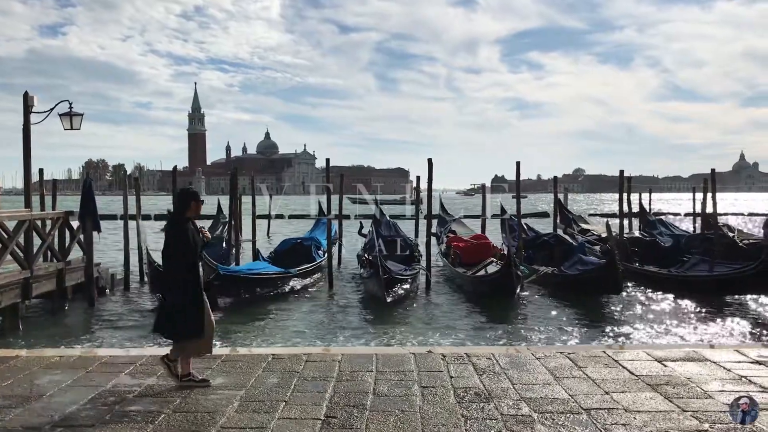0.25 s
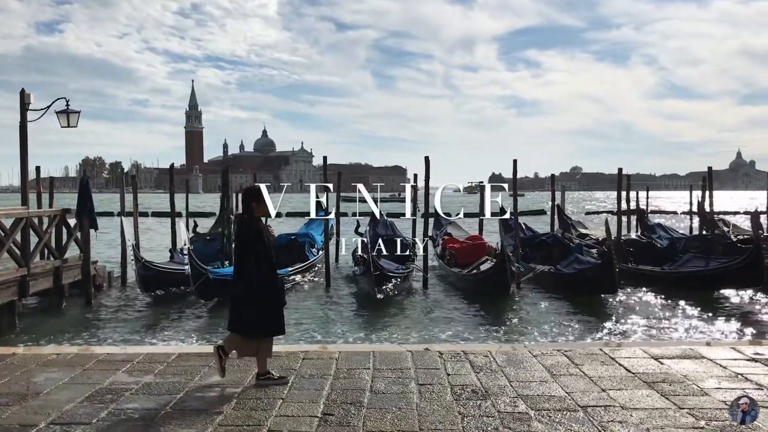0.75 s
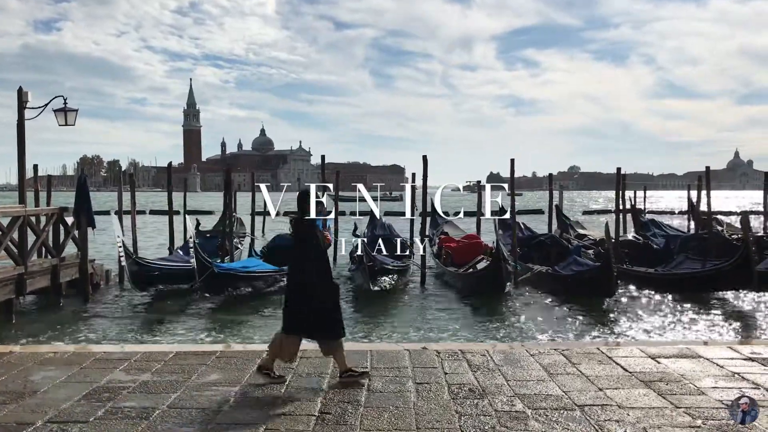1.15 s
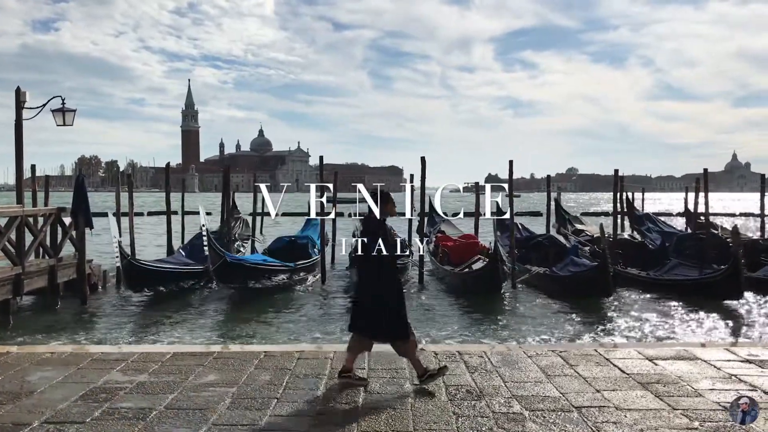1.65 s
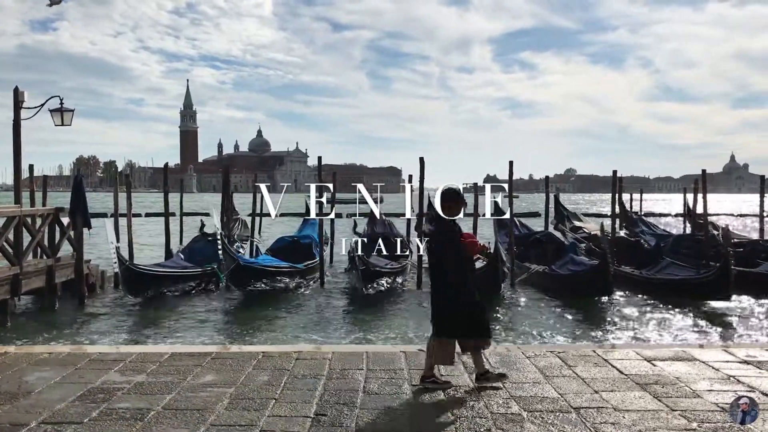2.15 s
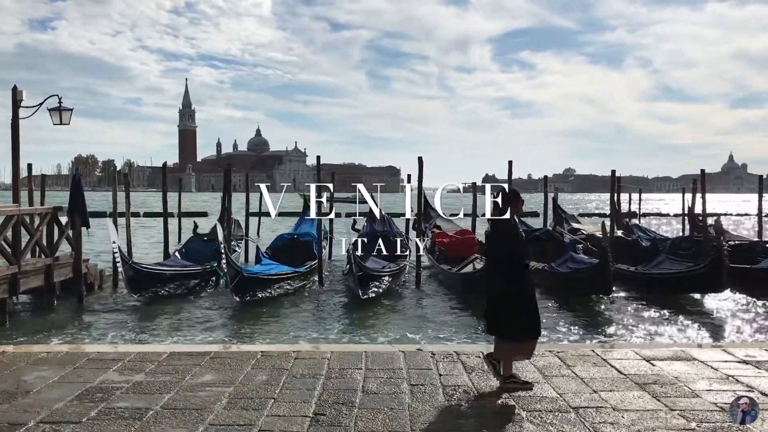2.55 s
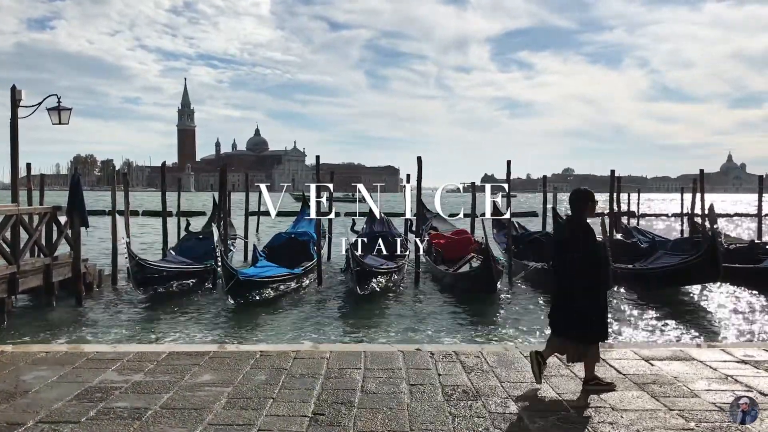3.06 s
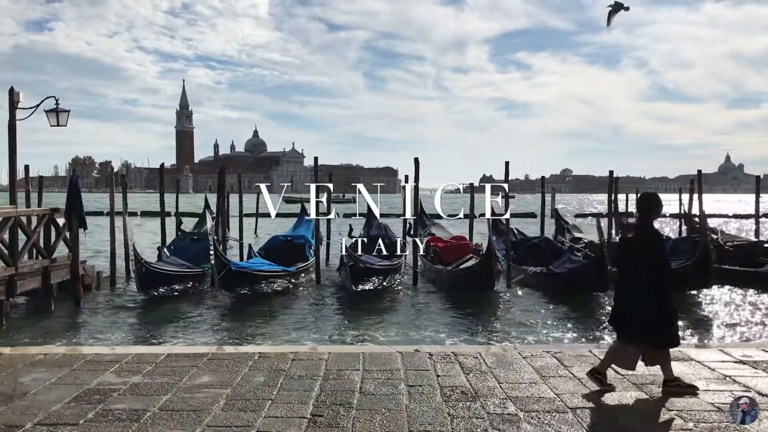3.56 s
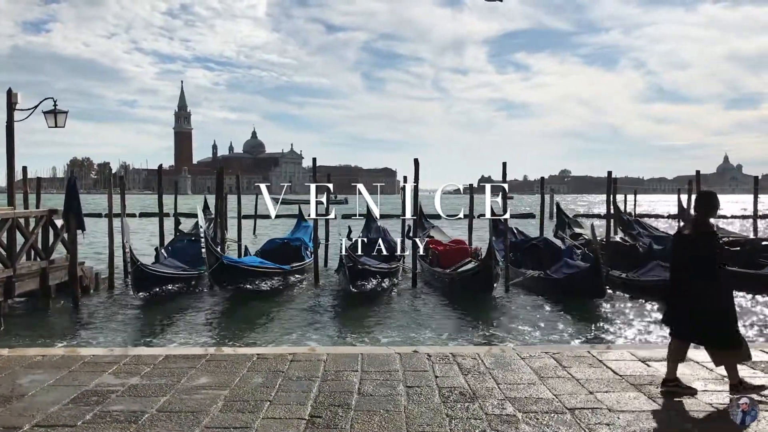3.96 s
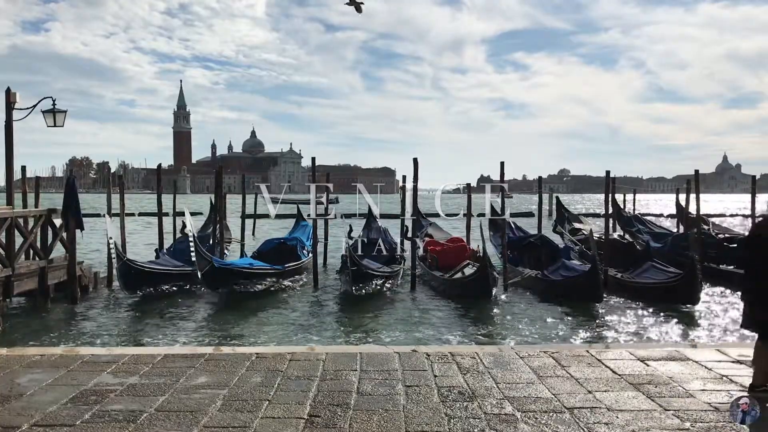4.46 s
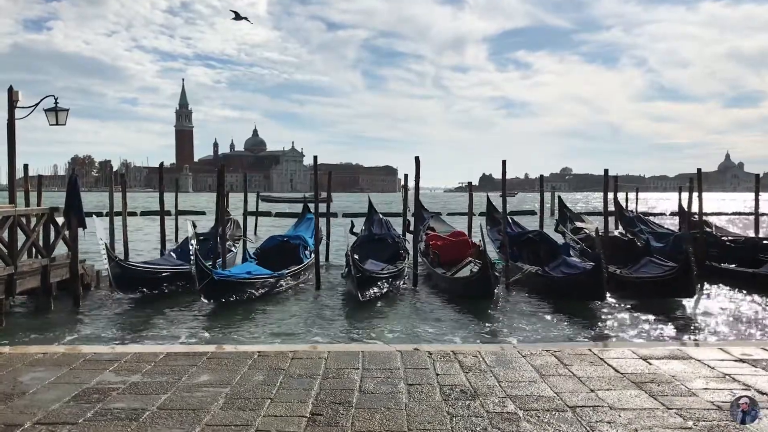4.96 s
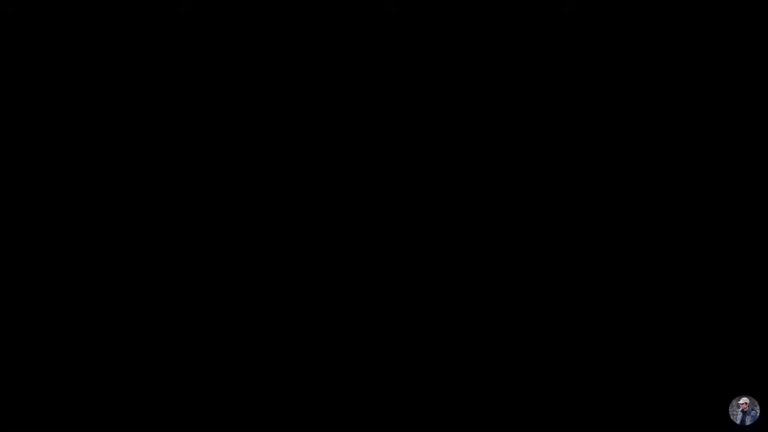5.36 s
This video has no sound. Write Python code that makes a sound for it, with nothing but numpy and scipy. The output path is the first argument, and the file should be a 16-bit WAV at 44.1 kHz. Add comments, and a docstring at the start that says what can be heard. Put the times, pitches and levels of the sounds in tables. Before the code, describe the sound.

Water washes against a stone quay close to the microphone in three surges, the first softer and the next two fuller. Each swells with gurgling bubbles and light spray, then drains away with distinct plops and sharp drips. Between them, water laps gently around moored wooden boats across a wide outdoor space. A faint low harbour rumble and thin hiss lie underneath.

```python
"""Three surges of water break on a stone quay close by, each a swarm of ringing bubbles with spray.
Single large bubbles and sharp drops stand out, thrown back by hulls, piles and stone.
Fine droplets tick on wet stone, and lagoon water laps far and wide around moored boats.
A thin hiss and a low harbour rumble lie underneath. The sound cuts off shortly before the end."""
import sys
import numpy as np
from scipy import signal
from scipy.fft import rfft, irfft
from scipy.io import wavfile
from scipy.ndimage import uniform_filter1d

SR = 44100
rng = np.random.default_rng(int(sys.argv[2]) if len(sys.argv) > 2 else 0)


def wav_record(signal):
    """Record a signal, one row per channel, as 16-bit PCM in the file named by sys.argv[1]."""
    frames = np.transpose(np.atleast_2d(signal))
    bounded = np.clip(frames, -1, 1)
    # unit amplitude maps onto the largest positive 16-bit level
    quanta = np.round(bounded * 32767).astype(np.int16)
    wavfile.write(sys.argv[1], SR, quanta)


N = 247682
HZ = np.fft.rfftfreq(N, 1 / SR)

# Overlapping waves that make up the three surges; spray and slosh are relative to the body:
# crest_s, body_db, build_s, drain_s, spray_db, left_over_right_db, slosh_db
WAVES = [(.23, -33.5, 0.084, 0.17, -13.5, 5, -27), (.37, -33, 0.15, 0.24, 0, 6, -20),
         (0.489, -28.5, 0.36, 0.28, -19, 4, -15), (.8, -36.5, 0.45, 0.2, -13.5, -8.5, -14),
         (2.082, -24.5, 0.15, 0.51, -9, 1.5, -14), (2.27, -20.5, 0.33, 0.19, -14.5, 0, -18.5),
         (2.37, -25, .15, 0.21, -17.5, -1, -26), (3.881, -29.5, 0.13, 0.27, -9.5, -0.5, -19.5),
         (4.062, -21.5, 0.26, 0.33, -15, 3, -25.5), (4.27, -35, 0.51, 0.23, -12.5, 2.5, -18.5)]
# Tone colour of the near breaking water: frequency_hz, gain_db
SURGE_TONE = [(71, -76), (120, -43), (266, -10.5), (369, -5), (522, -6), (906, -1), (2510, -9),
              (4830, -19.5), (6700, -20.5), (9880, -28), (14600, -29.5), (15800, -31.5)]
# How alike both sides of the near water sound (1 is mono): frequency_hz, likeness
SURGE_LIKENESS = [(110, .7), (200, 0.83), (380, 0.92), (1290, 0.91), (2380, .88), (4400, 0.99), (7000, 1),
                  (9800, 0.78), (12000, .45), (15000, .3)]
# Single large bubbles: start_s, level_db, pitch_hz, left_over_right_db, rise_octaves, ring_cycles
LARGE_BUBBLES = [(0.1818, -22.5, 2280, 4, 0.11, 3.4), (.206, -27, 560, 2, 0.16, 11),
                 (0.31, -30, 228, 3.5, .03, 7.8), (0.335, -28, 940, -5, 0.37, 13),
                 (0.4683, -19.5, 1196, 2, .06, 11), (.517, -24, 358, 5, 1.42, 9.1),
                 (0.549, -34.5, 286, 5, 0.32, 13), (0.564, -36, 940, 18, 0.33, 8.3),
                 (0.634, -34, 965, 15, 0.18, 26), (.7, -28, 640, -2.5, .19, 6.9),
                 (.727, -26, 545, -3, 0.27, 4.1), (.793, -30.5, 634, -8, 0.48, 23),
                 (.833, -33.5, 347, -3, 1.2, 24.4), (.87, -29, 696, -8, .61, 11),
                 (1.456, -37.5, 719, 11, .26, 6.8), (1.5244, -35.5, 1390, 13, .09, 11),
                 (1.548, -34.5, 1430, 16, .1, 6.9), (1.7694, -29.5, 1830, 12, .1, 8.4),
                 (1.81, -35, 1800, 10, .1, 11), (1.9615, -20, 2640, 4, .12, 4.4),
                 (2.024, -26, 333, 4, 0.18, 5.8), (2.056, -19, 433, 0, 0.12, 7.3),
                 (2.066, -29.5, 236, 1, .1, 8.2), (2.226, -25, 328, -1, 0.73, 18),
                 (2.293, -17.5, 342, -1, 1.77, 11), (2.32, -25, 343, 0, 1.5, 23.5),
                 (2.345, -30, 740, -11, 0.19, 13), (2.369, -32.5, 300, 4.5, 1.3, 11),
                 (2.394, -17.5, 616, 0, 0.16, 6.5), (2.543, -29.5, 1510, -1, .1, 24),
                 (2.571, -27, 863, 5, 0.7, 19.2), (2.684, -33.5, 630, -17, 0.21, 6.6),
                 (2.699, -35.5, 656, -8, 0.33, 14), (2.744, -39.5, 686, -13, 0.12, 11),
                 (2.764, -36.5, 413, -7, .14, 7.8), (3.0545, -32, 1480, 19, .09, 12),
                 (3.0704, -34, 1660, 13, .1, 12), (3.6681, -23.5, 2710, 1, .1, 7.3),
                 (3.702, -35, 252, 9, 0.18, 3.3), (3.759, -24.5, 2720, -.5, .1, 8.6),
                 (3.81, -22.5, 815, 2.5, 0.12, 13.5), (3.864, -27, 690, -5, .18, 17),
                 (3.869, -35, 253, -2, 0.092, 8), (3.909, -28, 407, 3, .1, 7.4),
                 (3.94, -28, 410, 5, .09, 11), (3.955, -33, 246, 3, 0.43, 12),
                 (4.015, -16, 650, 2, 0.19, 4.2), (4.1028, -13.5, 1396, 3, .1, 9),
                 (4.119, -20.5, 311, 3, 1.45, 9.2), (4.129, -22, 610, 4, 0.54, 12.6),
                 (4.1515, -16, 1610, 2, .14, 13), (4.209, -30, 293, 4.5, 0.12, 5),
                 (4.235, -21.5, 1130, 5, 0.35, 10.7), (4.255, -28, 303, 2.5, 0.79, 5.2),
                 (4.301, -23, 324, 5.5, 1.33, 4.4), (4.309, -26.5, 588, 13, 1.41, 8.9)]
# Drops striking stone and water: start_s, level_db, pitch_hz, left_over_right_db, ring_cycles
SHARP_DROPS = [(.0308, -37.5, 4940, -1, 7.9), (0.044, -41.5, 3570, .5, 8.6), (.1067, -41, 2820, -1.5, 7.4),
               (.1201, -39, 12890, 5, 7), (.1371, -36, 3370, 4.5, 7.2), (.182, -31, 5290, 6, 2.2),
               (.2044, -32, 5200, 3, 8.9), (.247, -21, 6100, 2, 2), (.3524, -28, 5070, 10, 1.8),
               (0.454, -32, 6950, .5, 6.4), (.543, -34.5, 8700, -7, 38), (.5601, -32, 6000, 0, 2),
               (1.3154, -35.5, 10500, -.5, 5.1), (1.3758, -41, 7050, .5, 6.4), (1.5482, -25, 5500, 2, 3),
               (1.761, -40, 8500, .5, 4), (1.8098, -37.5, 8140, 0, 6), (1.8425, -34, 3800, 8, 7.2),
               (1.8716, -40, 6300, 1, 7), (1.9013, -36, 6100, 0, 7), (2.06, -20.5, 6230, -1, 5.8),
               (2.36, -21.5, 6430, -1, 3.2), (2.431, -23, 6240, 2, 2), (3.2081, -38, 10700, 1, 6.3),
               (3.3199, -30, 5960, 2, 1.1), (3.4605, -33.5, 4700, 2.5, 4.3), (3.5144, -40, 11600, 1, 7),
               (3.6915, -40, 7240, 4, 5.2), (3.8003, -28, 4950, 0, 1.7), (4.2125, -12.5, 1910, 12, 1.5),
               (4.586, -24.5, 4470, -1, 2.4), (4.5994, -37, 5500, -1, 22), (4.6453, -37, 3800, -5, 10),
               (5.0579, -43, 11400, 5, 7.8)]
# Swell of the far lapping; spray is relative to the body: time_s, body_db, spray_db, left_over_right_db
LAPPING_SWELL = [(0, -46.5, -24.5, 4), (.3, -40.5, -10, 4), (.9, -40.5, -12, -2.5), (1.09, -40, -17, 5.5),
                 (1.3, -43.5, -15, 5), (1.47, -41.5, -19.5, 8), (1.749, -44.5, -18, 5.5),
                 (1.9, -38, -13, 6), (2.6, -40.5, -8.5, 0), (2.75, -41, -10.5, -1.5), (2.9, -40, -11, 7.5),
                 (3.1, -38.5, -15.5, 10), (3.64, -41, -16, 4.5), (3.78, -37, -18.5, 0),
                 (4.46, -42.5, -9, -1), (4.91, -42, -16.5, 1), (5.02, -42, -19.5, 4.5),
                 (5.08, -44.5, -20, 4)]
# Tone colour of the far water: frequency_hz, gain_db
LAPPING_TONE = [(71, -27.5), (120, -17), (144, -19.5), (221, -18.5), (289, -5), (481, -4), (578, -2.5),
                (802, -1), (1970, -6), (2900, -16.5), (4930, -13), (15800, -24)]
# How alike both sides of the far water sound (1 is mono): frequency_hz, likeness
LAPPING_LIKENESS = [(60, .7), (140, 0.85), (330, 0.76), (770, 0.3), (1800, 1), (3000, 0.053), (4200, 0.96),
                    (6400, 0.98), (9800, 0.52), (15000, 0.66)]
# Tone colour of the harbour rumble: frequency_hz, gain_db
RUMBLE_TONE = [(12, -61), (20, -23.5), (97, -9), (119, -7.5), (150, -3.5), (221, -1.5), (260, 2),
               (340, -30), (570, -120)]

FLANK_DB, FLANK_POWER = 22.5, 1.61  # fall from the crest, one build-up before it and one drain after it
CHURN_DB, CHURN_HZ = 1.22, 36  # the breaking water heaves unevenly
ALL_FAR_DB, ALL_NEAR_DB = -41.5, -32  # body levels between which the near water takes over
SLOSH_BELOW_HZ, SPRAY_ABOVE_HZ = 450, 3200  # the body lies between them
FULL_SURGE_DB, DULLING_DB_PER_DB = -14, .25  # a surge loses treble the further it is below full level
LAPPING_SLOSH_DB = -14.5  # relative to the body
SCATTER_DB, SCATTER_T60_S = -5.5, .05
CUT_S, FADE_S = 5.092, .04


def water():
    """Near surges, far lapping and droplets: the louder the water, the more of it is the near surge."""
    body_db, spray_db, pan_db, slosh_db = water_motion()
    nearness = np.clip((body_db - ALL_FAR_DB) / (ALL_NEAR_DB - ALL_FAR_DB), 0, 1)
    body, spray, slosh = (np.sqrt(nearness) * near + np.sqrt(1 - nearness) * far
                          for near, far in zip(surge(body_db), lapping()))
    lows = gain_of(body_db) * (body + gain_of(slosh_db) * slosh)
    highs = gain_of(body_db + spray_db) * spray + trickle(body_db)
    return panned(pan_db) * lows + panned(.3 * pan_db) * highs  # spray leans less to one side


def water_motion():
    """Waves and lapping add in power; the loudest has most say over spray, pan and slosh."""
    t = np.arange(N) / SR
    times_s, *columns = np.transpose(LAPPING_SWELL)
    far = [np.interp(t, times_s, column) for column in columns] + [np.full(N, LAPPING_SLOSH_DB)]
    curves = np.array([far] + [wave_curves(t, *wave) for wave in WAVES])
    heave = filtered(rng.standard_normal(N), CHURN_HZ, "low", order=2)
    curves[1:, 0] += CHURN_DB * unit_rms(heave)
    power = gain_of(curves[:, 0]) ** 2
    total = power.sum(0)
    spray_db, pan_db, slosh_db = ((power * curves[:, k]).sum(0) / total for k in (1, 2, 3))
    return 10 * np.log10(total), spray_db, pan_db, slosh_db


def wave_curves(t, crest_s, body_db, build_s, drain_s, *steady_db):
    """One wave swells to its crest and drains, while its spray, pan and slosh settings hold steady."""
    from_crest = np.where(t < crest_s, (crest_s - t) / build_s, (t - crest_s) / drain_s)
    return [body_db - FLANK_DB * from_crest ** FLANK_POWER] + [np.full(N, db) for db in steady_db]


def surge(body_db):
    """Water breaking close by: a dense bubble swarm whose body brightens as it swells."""
    bubbles = swarm(density=3500, spread_db=3.5, cycles=9.47, octaves=0.612)
    body, spray, slosh = water_bands(bubbles, SURGE_TONE, SURGE_LIKENESS, bubbly=0.84, left_lead_s=0)
    treble = filtered(body, 3900, "high", order=1)
    treble_gain = gain_of(DULLING_DB_PER_DB * (body_db - FULL_SURGE_DB))
    return body + (treble_gain - 1) * treble, spray, slosh


def water_bands(bubbles, tone, likeness, bubbly, left_lead_s):
    """Bubbles in hiss, spread into stereo and split into body, spray and slosh, each at rms 1."""
    hiss = rng.standard_normal((3, len(HZ), 2)) @ [1, 1j] / np.sqrt(2)
    swarms = rfft([np.roll(bubbles, k * N // 3) for k in range(3)])  # shared, left, right
    swarms /= np.sqrt(uniform_filter1d(abs(swarms) ** 2, size=1500) + 1e-12)  # flat spectrum
    bubble_share = np.clip(bubbly / (1 + HZ / 9000), 0, 1)  # the many smallest bubbles blur into hiss
    shared, *sides = np.sqrt(bubble_share) * swarms + np.sqrt(1 - bubble_share) * hiss
    delay = np.exp(-2j * np.pi * HZ * left_lead_s * (HZ < SPRAY_ABOVE_HZ))  # spray comes from ahead
    alike = np.clip(across_spectrum(likeness), 0, 1)
    stereo = np.sqrt(alike) * np.array([shared, shared * delay]) + np.sqrt(1 - alike) * np.array(sides)
    stereo *= gain_of(across_spectrum(tone))
    spray = 1 - 1 / (1 + (HZ / SPRAY_ABOVE_HZ) ** 8)
    slosh = 1 / (1 + (HZ / SLOSH_BELOW_HZ) ** 8)
    body = np.maximum(1 - spray - slosh, 0)
    return [unit_rms(irfft(stereo * np.sqrt(band), N)) for band in (body, spray, slosh)]


def swarm(density, spread_db, cycles, octaves, low_hz=190, sizes=44):
    """Bubbles of many sizes ring at random moments, small ones more often."""
    out = np.zeros(N)
    for hz in np.geomspace(low_hz, 15000, sizes):
        chance, strength = rng.random((2, N))
        births = chance < density * (hz / 1000) ** .7 / sizes / SR
        level_db = spread_db * np.minimum(-np.log(strength + 1e-9), 3.5)
        ring = bubble(hz, octaves * rng.uniform(0.36, 1.8), cycles * rng.uniform(0.43, 1.53))
        out += signal.oaconvolve(births * gain_of(level_db), ring)[:N]
    return out


def bubble(hz, octaves, cycles, attack=0.098):
    """A ringing air pocket whose pitch climbs as it nears the surface."""
    age = np.arange(int(2 * cycles / hz * SR) + 8) * hz / cycles / SR  # 1 after cycles / hz seconds
    turns = np.cumsum(hz * 2 ** (octaves * np.minimum(age, 1.3))) / SR
    envelope = (1 - np.exp(-age / attack)) * np.exp(-2.5 * age ** 2)
    return envelope / envelope.max() * np.sin(2 * np.pi * turns)


def pops():
    """The large bubbles and sharp drops, with the deep bass cut away."""
    out = np.zeros((2, N))
    for start_s, db, hz, pan_db, octaves, cycles in LARGE_BUBBLES:
        place(out, start_s, db, pan_db, bubble(hz, octaves, cycles))
    for start_s, db, hz, pan_db, cycles in SHARP_DROPS:
        place(out, start_s, db, pan_db, bubble(hz, 0.089, cycles, attack=.3))
    return filtered(out, 200, "high", order=4)


def scattered(sound):
    """A short, bright cloud of reflections follows each pop; the bass stays dry."""
    t = np.arange(4000) / SR
    cloud = rng.standard_normal((2, len(t))) * gain_of(-60 * t / SCATTER_T60_S) * (t > .002)
    cloud /= np.linalg.norm(cloud, axis=1, keepdims=True)
    reflections = signal.oaconvolve(filtered(sound, 820, "high", order=2), cloud, axes=1)[:, :N]
    return sound + gain_of(SCATTER_DB) * reflections


def trickle(body_db):
    """Fine droplets tick on wet stone, following most of the water's swell."""
    ticks = swarm(density=68, spread_db=4.0, cycles=7.9, octaves=0.16, low_hz=3520, sizes=16)
    level_db = -61 + .75 * (body_db - ALL_FAR_DB)
    return gain_of(level_db) * unit_rms(filtered(ticks, 7000, "low", order=1))


def lapping():
    """Far water around the boats: a thinner swarm, mostly hiss, that reaches the left side first."""
    bubbles = swarm(density=700, spread_db=3.5, cycles=11.46, octaves=0.438)
    return water_bands(bubbles, LAPPING_TONE, LAPPING_LIKENESS, bubbly=0.24, left_lead_s=0.00018)


def thin_hiss(level_db=-63.5, above_hz=10500):
    """A fine steady hiss at the top, unrelated between the sides."""
    spectrum = rfft(rng.standard_normal((2, N))) / np.sqrt(1 + (above_hz / (HZ + 1)) ** 6)
    return gain_of(level_db) * unit_rms(irfft(spectrum, N))


def harbour_rumble(level_db=-61, below_hz=260):
    """Steady low rumble of the harbour, mostly alike on both sides."""
    shared, left, right = rng.standard_normal((3, N))
    noise = shared + 0.57 * np.array([left, right])
    spectrum = rfft(noise) * gain_of(across_spectrum(RUMBLE_TONE)) * (HZ < below_hz)
    return gain_of(level_db) * unit_rms(irfft(spectrum, N))


def gain_of(db):
    """dB to gain."""
    return 10 ** (np.asarray(db) / 20)


def unit_rms(x):
    """Scales to rms 1."""
    return x / np.sqrt(np.mean(x ** 2) + 1e-20)


def across_spectrum(points):
    """Joins a table's points along a log-frequency axis."""
    hz, value = np.transpose(points)
    return np.interp(np.log(HZ + 1), np.log(hz + 1), value)


def panned(db):
    """Left and right gains; positive leans left."""
    return gain_of(np.array([db / 2, -db / 2]))


def place(mix, start_s, db, pan_db, sound):
    """Mixes a mono sound in at a time, level and pan."""
    part = mix[:, round(start_s * SR):][:, :len(sound)]
    part += gain_of(db) * panned(pan_db)[:, None] * sound[:part.shape[1]]


def filtered(x, hz, kind, order):
    """Low- or high-pass."""
    return signal.sosfilt(signal.butter(order, hz, kind, fs=SR, output="sos"), x)


def scene():
    """Water and single pops over the hiss and the harbour."""
    return water() + scattered(pops()) + thin_hiss() + harbour_rumble()


def record(dry):
    """A quick fade to silence, then a steep cut of the highest treble."""
    t = np.arange(N) / SR
    fade = gain_of(-4000 * np.clip(t - CUT_S, 0, FADE_S)) * (t < CUT_S + FADE_S)
    low_pass = signal.firwin(511, 15900, window=("kaiser", 9), fs=SR)
    return signal.oaconvolve(dry * fade, low_pass[None], "same")


dry = scene()
out = record(dry)
wav_record(out)
```